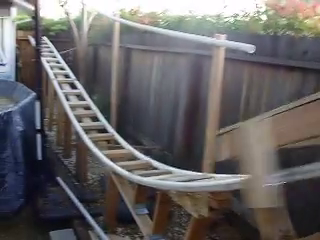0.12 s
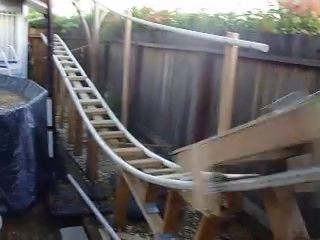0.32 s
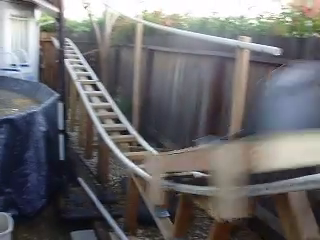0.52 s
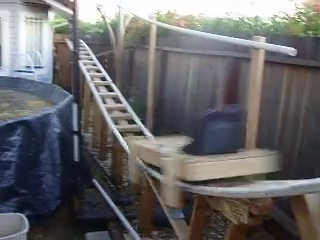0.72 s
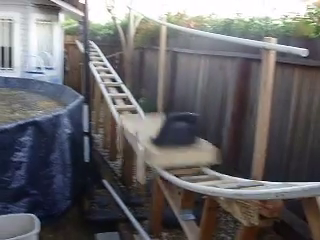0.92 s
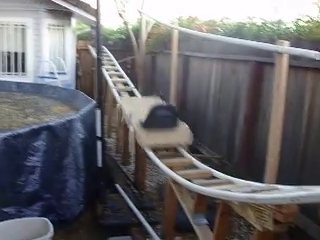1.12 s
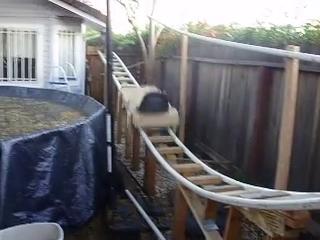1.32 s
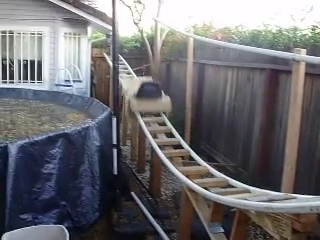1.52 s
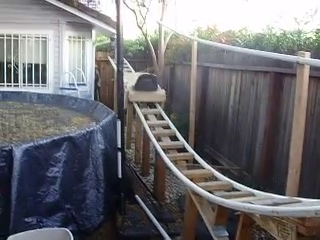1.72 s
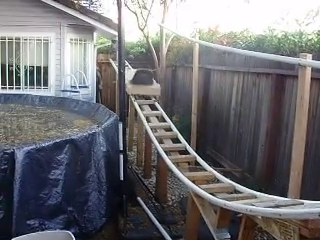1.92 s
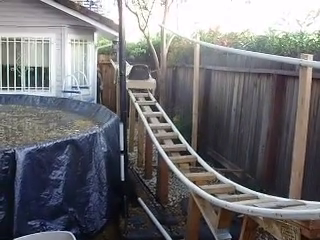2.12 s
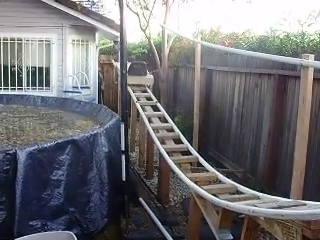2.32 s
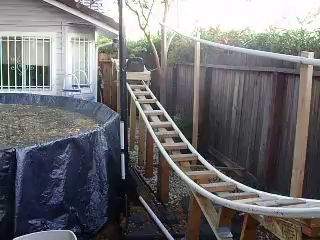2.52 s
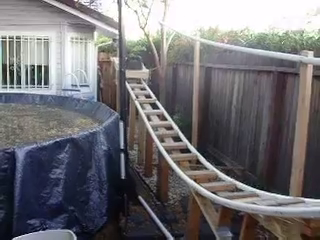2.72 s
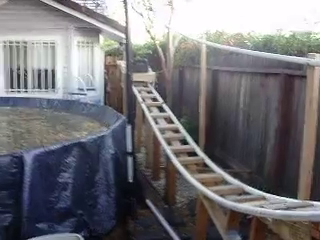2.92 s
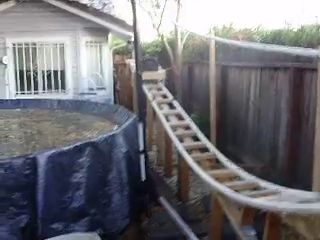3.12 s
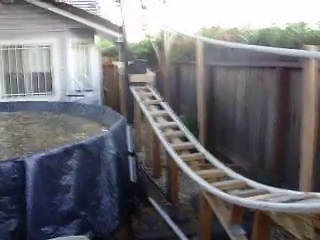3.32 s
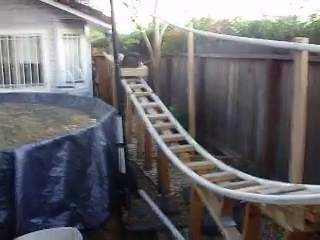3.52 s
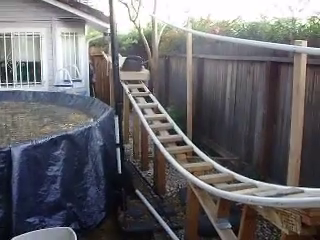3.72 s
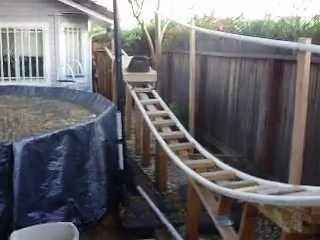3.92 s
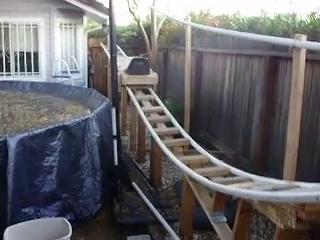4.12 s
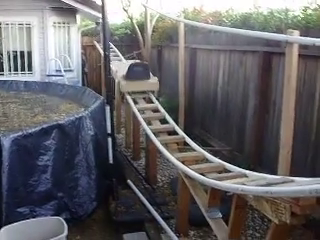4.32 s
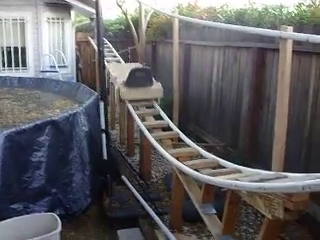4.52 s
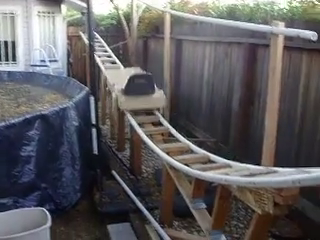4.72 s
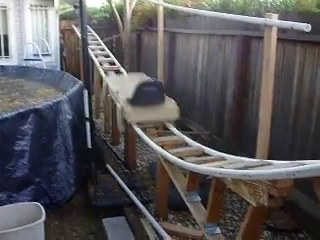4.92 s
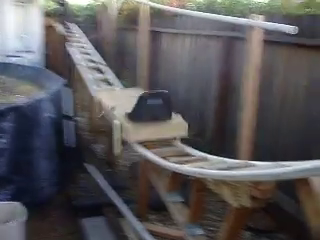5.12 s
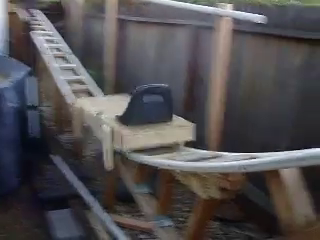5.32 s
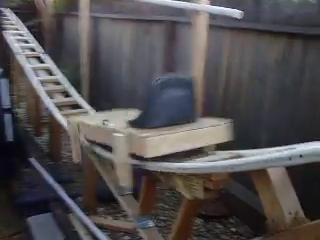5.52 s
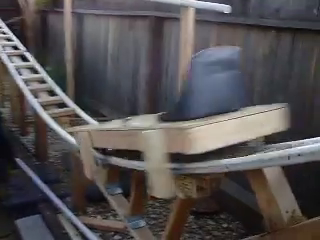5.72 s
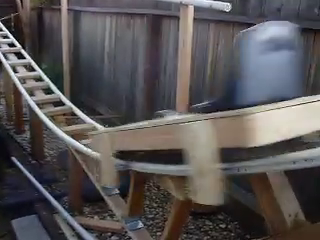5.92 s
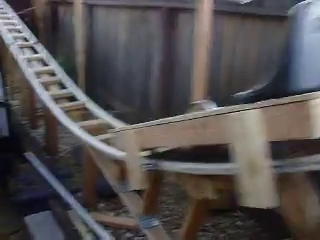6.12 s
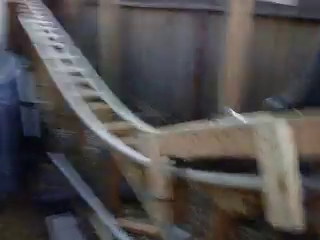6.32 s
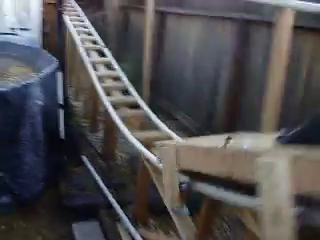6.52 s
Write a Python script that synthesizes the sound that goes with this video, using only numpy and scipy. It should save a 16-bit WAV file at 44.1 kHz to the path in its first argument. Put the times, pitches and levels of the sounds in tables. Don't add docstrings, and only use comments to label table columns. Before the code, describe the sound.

A wooden cart rolls close by on plastic pipe rails, wheels rattling, boards rumbling and wood knocking hard. It recedes, slows and almost falls silent over a dull, distant hum. Then it rolls back, grinding and jolting loudly again before fading. The small outdoor microphone sounds boxy and narrow, distorting on the hits.

```python
import sys
import numpy as np
from scipy import signal
from scipy.fft import rfft, irfft, next_fast_len
from scipy.io import wavfile
from scipy.ndimage import uniform_filter1d

SR = 44100
rng = np.random.default_rng(int(sys.argv[2]) if len(sys.argv) > 2 else 0)


def generate_wav(sig):
    pcm = np.round(np.clip(np.atleast_2d(sig).T, -1, 1) * 32767).astype(np.int16)
    wavfile.write(sys.argv[1], SR, pcm)


def volts_from_db(level):
    exponent = np.asarray(level, float) / 20
    return 10 ** exponent


N = 288855

# start in seconds, wheel rattle peak in dB, board rumble peak in dB, length in seconds.
TIE_JOLTS = [(0.144, -16.5, -8, 0.04), (0.723, -6, -6.5, 0.042), (0.7645, 2.5, -18.5, .023),
             (0.837, 10.5, 1.5, .028), (1.3412, -2.5, -6.5, 0.051), (1.621, -11, -14, 0.029),
             (2.043, -10, -13.5, .035), (3.958, -14.5, -16, 0.057), (4.41, 3, -2, 0.032),
             (4.757, -4, -0.5, 0.02), (4.785, -6.5, -11.5, 0.02), (4.825, -8.5, -9, 0.014),
             (4.987, 10, 4.5, .033), (5.308, -5.5, -20.5, 0.025), (5.411, -10.5, -12, 0.058),
             (5.4986, 6, -2.5, 0.031), (5.547, -4, -9, 0.056)]
BOARD_JOLTS = [(0.069, -9, -25, 0.025), (0.292, -26, -4.5, 0.019), (0.332, 12.5, 3, 0.024),
               (0.401, -23, -20, 0.012), (0.4557, 3.5, -3.5, 0.015), (0.49, -3.5, -4.5, 0.061),
               (0.66, -2, -4.5, 0.048), (0.799, 5, 4, .014), (0.936, 12.5, -16, 0.015),
               (0.9663, 2.5, -5, .018), (0.991, -3, -5, .02), (1.2, -5, -12, .057), (1.5004, -8, -19, .02),
               (1.6571, -10.5, -31, 0.024), (2.0201, -5.5, -8.5, 0.04), (2.2657, -10.5, -12, 0.022),
               (2.541, -22, -23, 0.056), (3.934, -20.5, -11.5, .023), (4.205, -19.5, -17.5, 0.053),
               (4.516, -14, -24.5, 0.045), (4.8706, -1.5, -6.5, .025), (4.897, -23, -5, 0.023),
               (4.9186, -3.5, -11, 0.018), (5.098, 0, -6.5, 0.021), (5.198, -14, -4, 0.016),
               (5.238, -9.5, -10.5, 0.025), (5.733, 12.5, 8, 0.014), (6.034, -21.5, -18.5, .047)]
PIPE_JOLTS = [(0.023, -17, -4, .03), (0.915, 1.5, 2, .03), (1.042, 4, -3.5, 0.028),
              (1.3677, -9.5, -10.5, .027), (1.416, -5.5, -12, 0.043), (1.5979, -4.5, -6, 0.029),
              (2.285, -9.5, -21.5, .047), (2.6076, -18.5, -19.5, 0.034), (1.706, -14.5, -30.5, 0.024),
              (2.185, -15.5, -34, .025), (2.704, -26, -25, 0.059), (3.786, -31, -27, 0.035),
              (5.845, -14.5, -12, 0.022), (5.575, -8, -7.5, 0.022), (0.1, -22, -7.5, .04),
              (6.195, -34, -34, 0.027), (6.52, -30, -27, .04), (5.367, -13, -16, .026),
              (5.801, 3, -2.5, 0.0068), (5.9524, -12, -13, 0.035), (5.981, -5.5, -10.5, 0.024),
              (6.385, -21, -25.5, 0.033)]
AXLE_JOLTS = [(0.0, 1.5, -0.5, 0.012), (0.1957, 8.5, 4, 0.026), (0.432, -15, -9.5, 0.018),
              (0.5819, -0.5, -12.5, 0.029), (0.6145, -9, -10, 0.024), (1.1417, 3, .4, .035),
              (1.234, 3.5, -10, 0.031), (1.4418, 1, -5, 0.027), (1.8092, -3.5, -16, 0.035),
              (2.069, -4.5, -17, 0.029), (2.636, -20.5, -26, 0.033), (4.37, -6.5, -15.5, 0.025),
              (4.4523, -7.5, -17, .045), (4.556, -9, -14.5, 0.021), (4.6107, -1, -7.5, 0.029),
              (5.029, 1.5, -16, 0.042), (5.145, 4.5, -4, 0.024), (5.758, -0.5, -7.5, .025),
              (5.8633, 1.5, -1, 0.025), (5.894, 1, -6, 0.0088), (6.146, -27, -42, 0.085),
              (6.299, -31, -24, 0.017), (6.41, -29, -21, 0.011), (6.454, -7, -17, .007)]


def evened(x):
    return x / np.sqrt(np.mean(x ** 2) + 1e-20)


def curve(rows):
    seconds, values = np.transpose(rows)
    return np.interp(np.arange(N) / SR, seconds, values)


def add_at(out, start_s, sound):
    part = out[round(start_s * SR):][:len(sound)]
    part += sound[:len(part)]


def resonate(x, hz, width_hz):
    r = np.exp(-np.pi * width_hz / SR)
    turn = np.exp(2j * np.pi * hz / SR)
    return 2 * signal.lfilter([1 - r], [1, -r * turn], x).real


def humming_noise(hz, width_hz):
    return resonate(resonate(rng.standard_normal(N), hz, width_hz), hz, 2 * width_hz)


def coloured(points):
    size = next_fast_len(N)
    hz = np.fft.rfftfreq(size, 1 / SR)
    f, db = np.transpose(points)
    gain = volts_from_db(np.interp(np.log(hz + 1), np.log(f + 1), db))
    return evened(irfft(rfft(rng.standard_normal(size)) * gain, size)[:N])


def grit(size, per_s, spread_db, smooth):
    specks = rng.standard_normal(size) * (rng.random(size) < per_s / SR)
    specks = specks * volts_from_db(spread_db * np.minimum(rng.exponential(1, size), 3.0))
    return evened(specks) + smooth * rng.standard_normal(size)


def flutter(rate_hz, depth_db):
    steps = evened(uniform_filter1d(rng.standard_normal(4000), size=3))
    wander = np.interp(np.arange(N) * rate_hz * 6 / SR, np.arange(4000), steps)
    return evened(volts_from_db(depth_db * wander))


def jolt_shape(length_s, rise_s, square):
    t = np.arange(round(0.25 * SR)) / SR
    chatter = np.exp(-(t / length_s) ** square)
    tail = 0.045 * np.exp(-t / 0.089)
    return (1 - np.exp(-t / rise_s)) * (chatter + tail)


def force(law, starts, peaks_db, lengths, rise_s):
    # time in seconds, level in dB.
    roll = [(0.0, -15.5), (0.25, -15), (0.6, -11), (1.06, -11), (1.33, -16.5), (1.84, -22), (2.22, -24),
            (2.75, -35.5), (3.68, -33.5), (4.41, -26.5), (4.83, -19.5), (5.0, -11.5), (5.29, -15),
            (5.64, -22), (5.89, -18.5), (6.15, -35.5), (6.4, -37.5), (6.55, -28)]
    slope, offset_db = law
    power = volts_from_db(2 * (slope * curve(roll) + offset_db))
    for start, db, length in zip(starts, peaks_db, lengths):
        shape = volts_from_db(db) * jolt_shape(length, rise_s, 1.79)
        add_at(power, start, shape ** 2)
    return np.sqrt(power)


def body(push, drive, modes, clump_hz, clump_db):
    click = signal.unit_impulse(2048)
    rings = []
    for k, (hz, width_hz, db) in enumerate(modes):
        ring = resonate(resonate(click, hz, 2.21 * width_hz), hz, 2.21 * width_hz)
        rings.append((-1) ** k * volts_from_db(db) * ring)
    push = push * evened(drive) / np.linalg.norm(sum(rings))
    return sum(signal.oaconvolve(push * flutter(clump_hz, clump_db), ring)[:N] for ring in rings)


def wheels(contact):
    # pitch in Hz,
    # width in Hz, level in dB.
    pitches = [(1622, 150, 1.5), (1984, 250, 1.5), (2461, 201, 7.5), (2993, 274, 0.5), (3460, 354, -0.5),
               (4350, 400, -6), (4250, 220, -10.5), (2412, 50, -1), (3423, 44, -4)]
    # dB per dB of rolling, offset in dB.
    wheels_law = (1.12, -12.5)
    s, rattle_db, _, length = np.transpose(TIE_JOLTS + BOARD_JOLTS + PIPE_JOLTS + AXLE_JOLTS)
    push = force(wheels_law, s, rattle_db - 12.5, 1.026 * length, rise_s=0.0026)
    return body(contact * push, grit(N, 2500, 2.7, 1.0), pitches, 28, 4.07)


def boards(contact):
    # pitch in Hz, width in Hz, level in dB.
    pitches = [(599, 153, -1.5), (797.6, 59.6, 4.5), (923, 125, 0.5), (1195, 168, 1), (1412, 423, -6)]
    # dB per dB of rolling, offset in dB.
    boards_law = (0.99, 0.06)
    s, _, rumble_db, length = np.transpose(TIE_JOLTS + BOARD_JOLTS + PIPE_JOLTS + AXLE_JOLTS)
    push = force(boards_law, s, rumble_db - 3.5, 1.113 * length, rise_s=0.0036)
    return body(contact * push, grit(N, 1500, 2.05, 0.76), pitches, 22, 1.98)


def struck_parts():
    out = np.zeros(N)
    for jolts, hz in [(TIE_JOLTS, 1405), (BOARD_JOLTS, 1506), (PIPE_JOLTS, 1986), (AXLE_JOLTS, 2330)]:
        for s, db, _, length in jolts:
            shape = jolt_shape(length, 0.0007, 1.0)
            ring = evened(resonate(grit(len(shape), 900, 1.0, 0.97), hz, 120))
            add_at(out, s, ring * shape * volts_from_db(db - 16.5))
    return out


def knocks():
    # start in seconds, peak in dB, lower ring in Hz, upper ring in dB.
    blows = [(0.198, 9, 920, -19), (0.332, 7, 669, -19.5), (0.46, -2.5, 965, -8.5), (0.837, 7.5, 987, -4),
             (1.236, 0, 772, -13.5), (1.598, 3, 918, -20), (1.814, -1.5, 882, -11.5),
             (2.025, -13.5, 918, -19), (2.262, -7, 758, -11), (2.54, -13, 1150, -9), (2.608, -13, 990, -11),
             (3.469, -21.5, 706, -6), (3.943, -21.5, 1080, -4), (3.963, -2, 1569, -12),
             (4.376, -9.5, 674, -1.5), (4.412, 0.2, 804, -28.5), (4.454, -6, 765, -6),
             (4.561, -15.5, 960, -6), (4.618, -4, 750, -19), (4.76, -0.5, 823, -25.5),
             (4.878, 8, 1308, -26), (5.154, 8.5, 780, -6.5), (5.313, 4, 790, -13.5),
             (5.419, 1, 1302, -26.5), (5.502, 10.5, 1090, -20.5), (5.729, 5, 845, -11.5),
             (5.872, 7.5, 1076, -22), (5.98, -6.5, 1207, -23), (6.39, -16.5, 755, -11),
             (6.455, -7, 1020, -25)]
    upper_hz, t60_s = 2276, 0.024
    out = np.zeros(N)
    t = np.arange(round(0.1 * SR)) / SR
    rise = 1 - np.exp(-t / 0.0016)
    for s, db, low_hz, high_db in blows:
        tick = rng.standard_normal(len(t)) * np.exp(-t / 0.00037)
        low = volts_from_db(-60 * t / t60_s) * np.sin(2 * np.pi * low_hz * t)
        high = np.sin(2 * np.pi * upper_hz * t) + 0.7 * tick
        high = volts_from_db(high_db + 8 - 80 * t / t60_s) * high
        add_at(out, s, volts_from_db(db) * (low + high) * rise)
    return out


def frame():
    # start in seconds, drone in dB, bending note in dB.
    thuds = [(0.0, -9.5, -39), (0.193, -12, -13.5), (0.336, -5, -15.5), (0.49, -12, -26),
             (0.621, -10, -24.5), (0.837, -2.5, -32.5), (0.916, -5.5, -24), (0.9665, -16, -15.5),
             (1.14, -12.5, -21.5), (1.26, -28, -22.5), (1.44, -22, -29), (1.6177, -14, -33.5),
             (1.79, -25, -25), (2.03, -18, -38.5), (2.2637, -19, -37), (2.58, -34, -32.5), (3.73, -35, -45),
             (3.931, -19, -45), (4.225, -17, -26), (4.41, -16, -32), (4.535, -21.5, -24),
             (4.756, -14.5, -25.5), (4.87, -24, -14.5), (4.995, -6, -22.5), (5.2394, -7.5, -23.5),
             (5.409, -4.5, -12), (5.5, -4, -27), (5.75, -8, -27), (5.8645, -9, -25.5), (5.97, -11.5, -31)]
    # start in s, drone in dB, bending note in dB, length in s.
    groans = [(0.112, -12, -32, 0.072), (0.39, -10, -33, 0.11), (1.17, -23, -24, 0.049),
              (4.6, -21.5, -26, .05), (4.703, -30, -28, .04), (4.47, -22, -40, .03),
              (5.13, -10, -23, 0.052), (5.62, -17, -60, .1), (6.08, -28, -44, 0.088),
              (6.35, -25.5, -47, 0.094), (6.445, -15, -38, .02), (6.49, -25, -40, 0.052),
              (5.568, -9.5, -47.5, 0.025)]
    # pitch in Hz, width in Hz, level in dB.
    pitches = [(254, 37, -4), (325.3, 37.3, 0.5), (401.6, 17, 4), (477, 31.4, -1.5)]
    # frequency in Hz, level in dB.
    ground_spectrum = [(12, -54), (20, -32.5), (48, -9), (92, -11.5), (135, -14), (200, 1), (260, -22),
                       (440, -120)]
    # dB per dB of rolling, offset in dB.
    frame_law = (1, -12.5)
    beam_law = (0.96, -19.5)

    thud_s = 0.03
    s, drone_db, beam_db, spell = np.transpose([(*row, thud_s) for row in thuds] + groans)
    shake = force(frame_law, s, drone_db - 6.0, 1.43 * spell, rise_s=0.018)
    swing = force(beam_law, s, beam_db + 2, 0.027 + spell, rise_s=0.028)
    drone = body(shake, rng.standard_normal(N), pitches, 13, 3.0)

    beam = humming_noise(197.3, 23)
    loudness = np.sqrt(uniform_filter1d(evened(beam) ** 2, size=1300))
    beam = evened(beam / (loudness + 0.62))
    ground = volts_from_db(-7.0) * uniform_filter1d(shake, 3000) * coloured(ground_spectrum)
    return drone, ground + beam * swing


def fences(x):
    t = np.arange(round(0.4 * SR)) / SR
    signs = rng.choice([-1.0, 1.0], len(t))
    hits = (rng.random(len(t)) < 2000 / SR) * (t > 0.006)
    taps = signs * hits * volts_from_db(-60 * t / 0.33)
    return signal.oaconvolve(x, taps / np.linalg.norm(taps))[:N]


def yard():
    # frequency in Hz, level in dB.
    wash = [(15, -51.5), (25, -8), (53, -13), (80, -16.5), (168, -12.5), (248, -23), (407, -28), (484, -19),
            (601, -9.5), (814, -4), (907, -9), (1340, -14), (1660, -19.5), (3700, -35.5), (4400, -54.5),
            (5720, -88.5), (9680, -120)]
    # time in seconds, level in dB.
    facing = [
        (0, 2),
        (2.6, -2),
        (3.2, -2.5),
        (3.9, -3.5),
        (5.9, 1.5),
        (6.2, -14.5),
        (6.55, -3),
    ]
    hollow = evened(humming_noise(721, 73))
    return volts_from_db(-29.5 + curve(facing)) * (coloured(wash) + volts_from_db(-4.5) * hollow)


def scene():
    contact = flutter(30, 0.5)
    drone, felt = frame()
    near = wheels(contact) + boards(contact) + struck_parts() + knocks() + drone
    return (near + volts_from_db(-11.5) * fences(near) + felt + yard())[None]


def top_cut(x):
    return signal.sosfilt(signal.butter(12, 15700, fs=SR, output="sos"), x)


def record(dry):
    sensor_limit, band_hz, ceiling = 0.73, 3990, 0.71
    loudness = np.sqrt(uniform_filter1d(dry ** 2, 300, axis=1) + 1e-12)
    hiss = (volts_from_db(-67) + volts_from_db(-18) * loudness) * rng.standard_normal(dry.shape)
    sensed = np.clip(dry, -sensor_limit, sensor_limit) + hiss
    voice_band = signal.firwin(151, band_hz, window=("kaiser", 8.0), fs=SR)
    narrow = signal.oaconvolve(sensed, voice_band[None], "same")
    mix = np.clip(narrow, -ceiling, ceiling) - 0.0025
    return top_cut(mix)


dry = scene()
out = record(dry)
generate_wav(out)
```